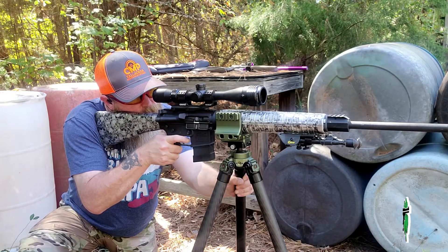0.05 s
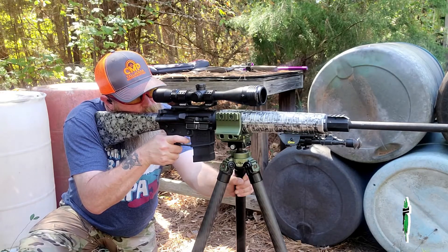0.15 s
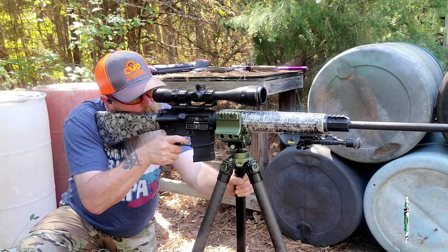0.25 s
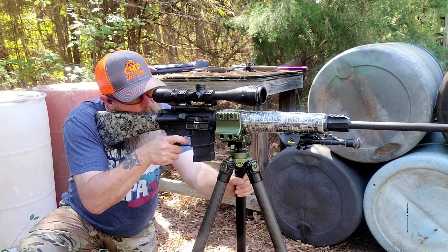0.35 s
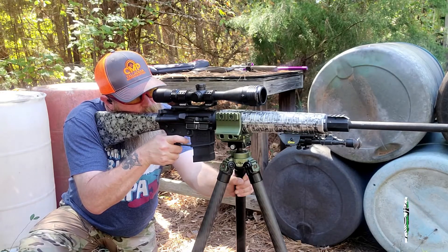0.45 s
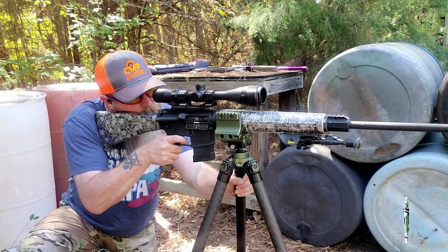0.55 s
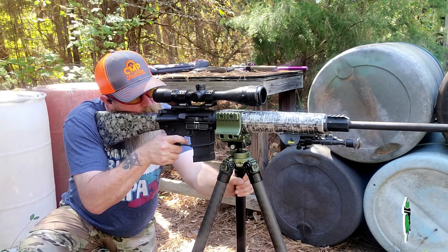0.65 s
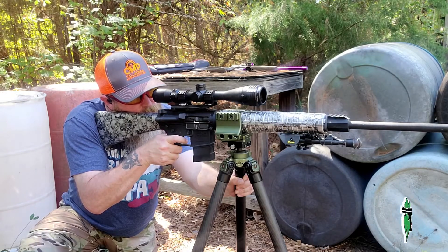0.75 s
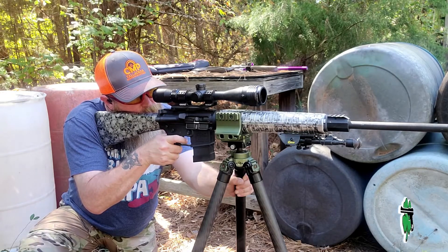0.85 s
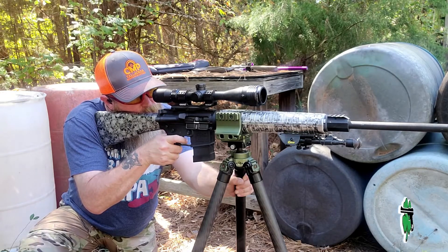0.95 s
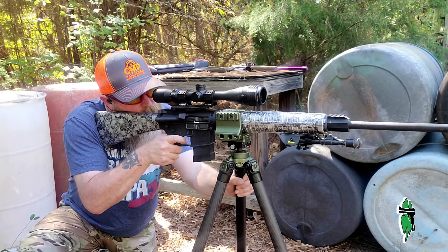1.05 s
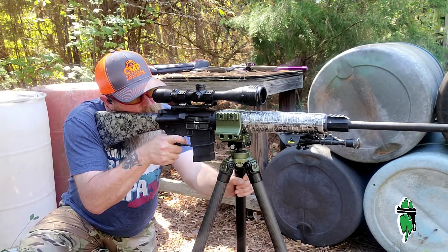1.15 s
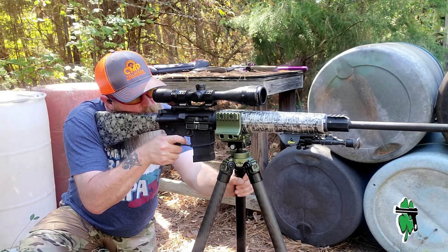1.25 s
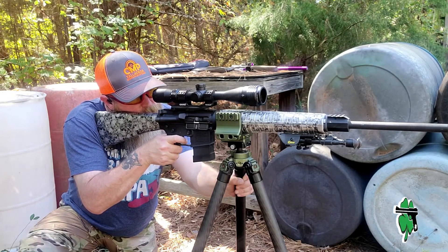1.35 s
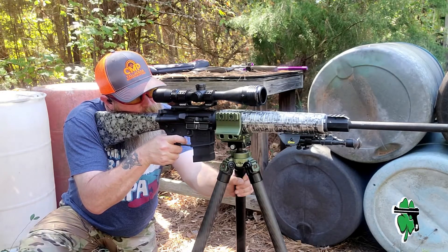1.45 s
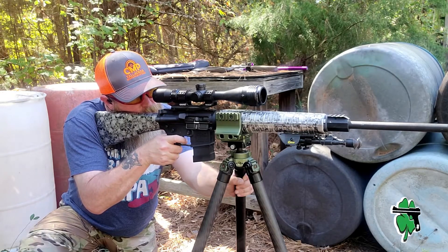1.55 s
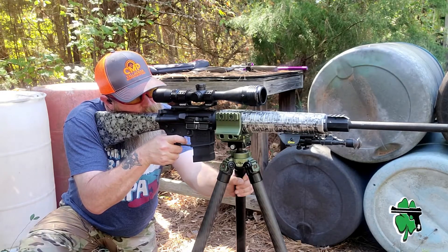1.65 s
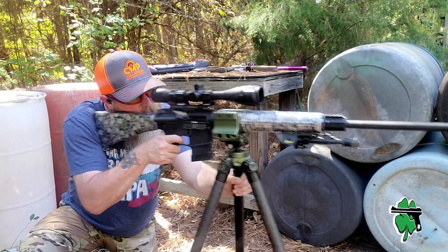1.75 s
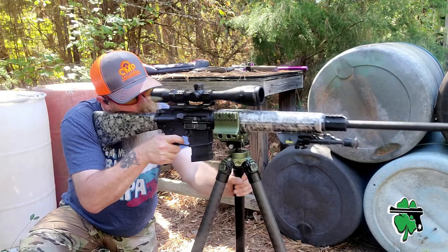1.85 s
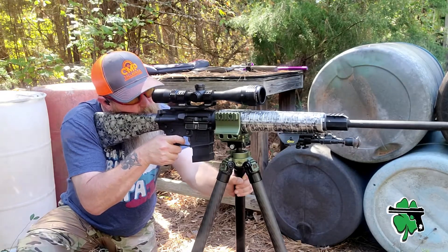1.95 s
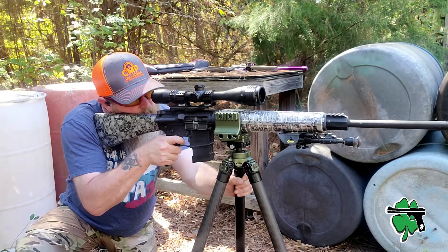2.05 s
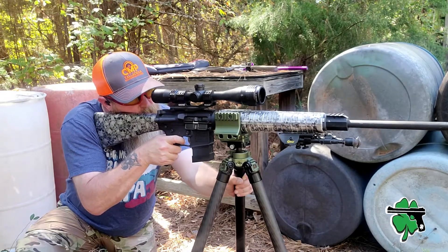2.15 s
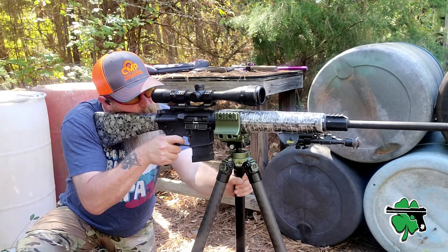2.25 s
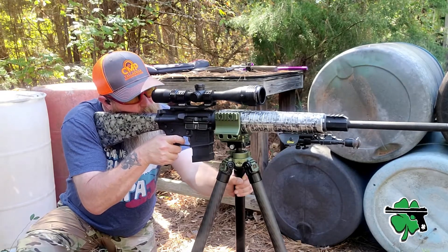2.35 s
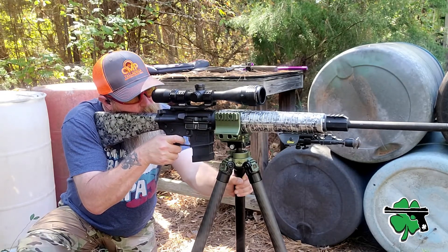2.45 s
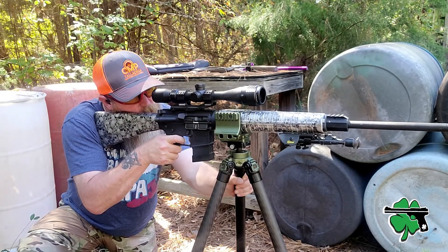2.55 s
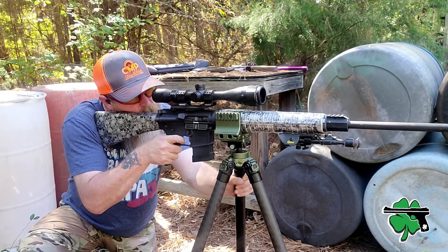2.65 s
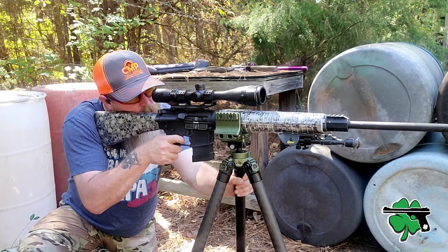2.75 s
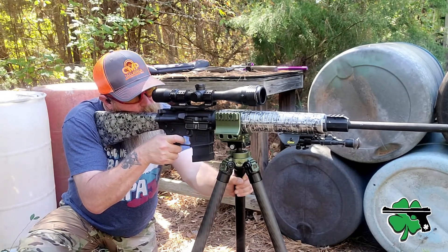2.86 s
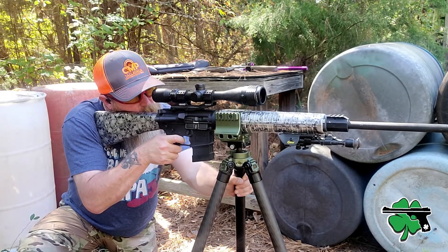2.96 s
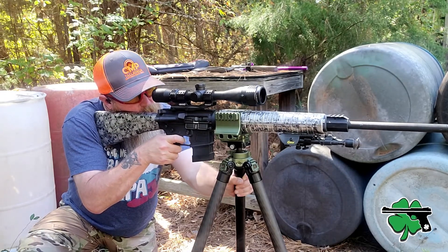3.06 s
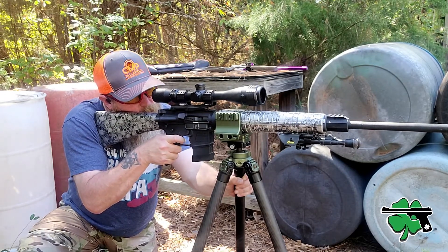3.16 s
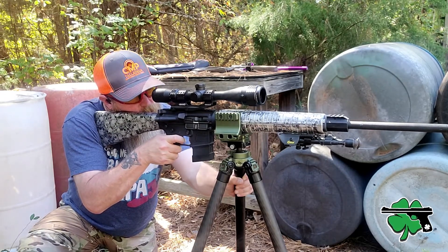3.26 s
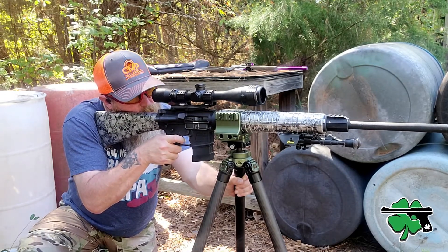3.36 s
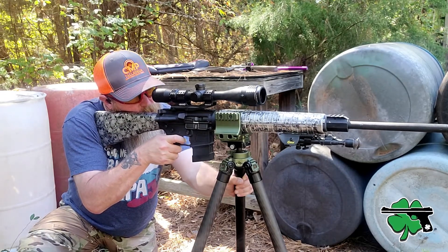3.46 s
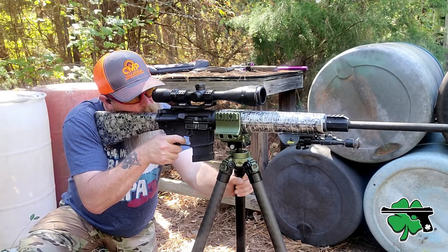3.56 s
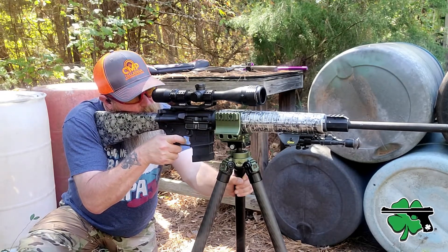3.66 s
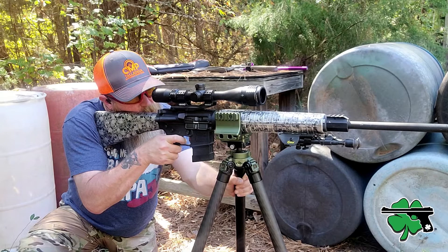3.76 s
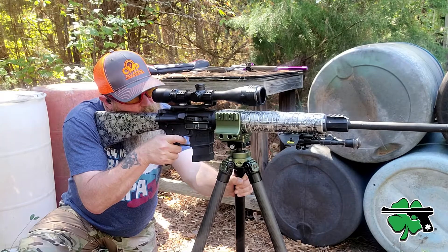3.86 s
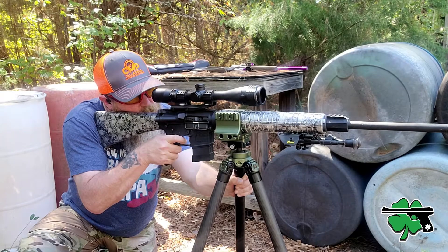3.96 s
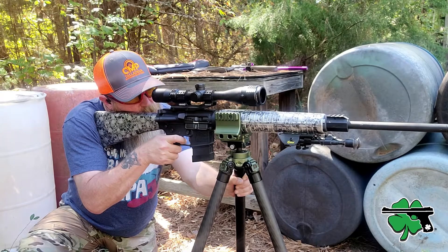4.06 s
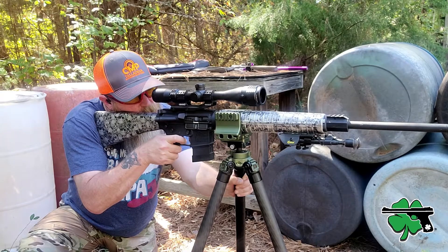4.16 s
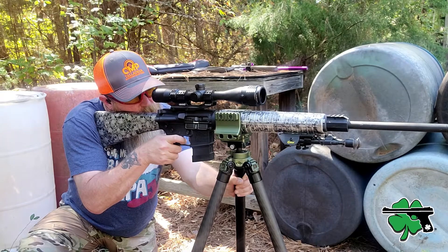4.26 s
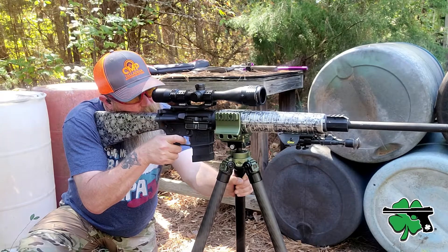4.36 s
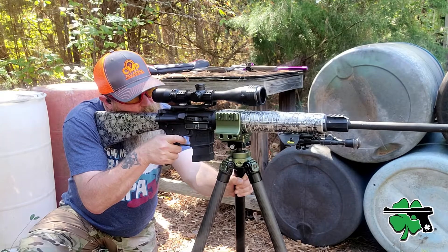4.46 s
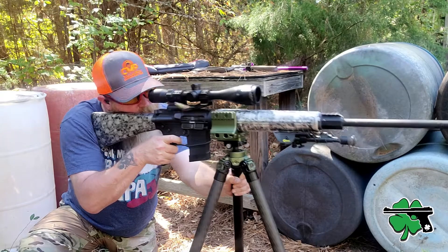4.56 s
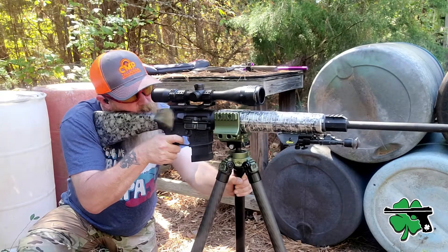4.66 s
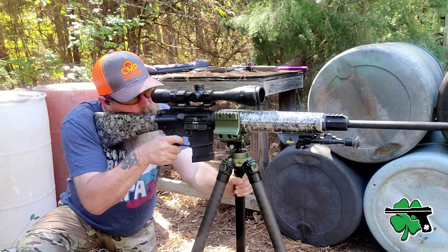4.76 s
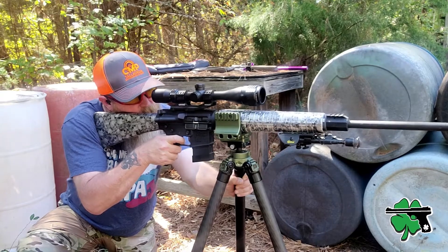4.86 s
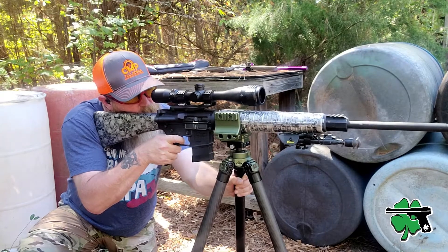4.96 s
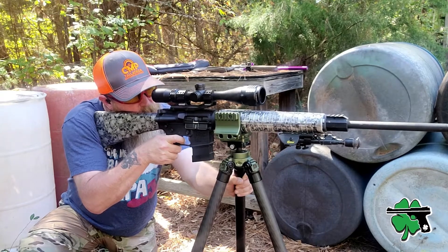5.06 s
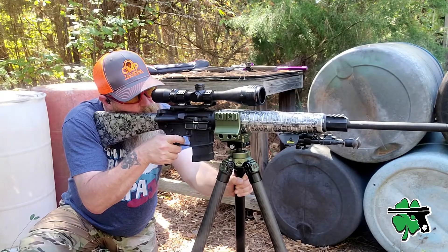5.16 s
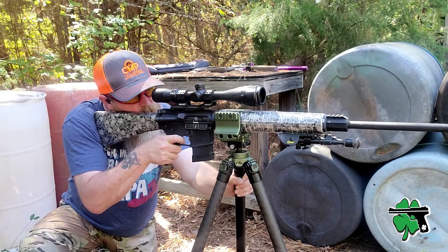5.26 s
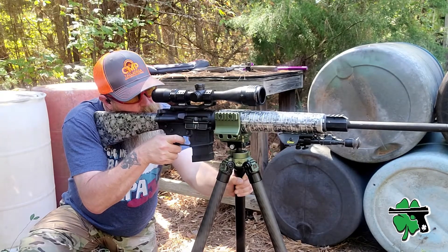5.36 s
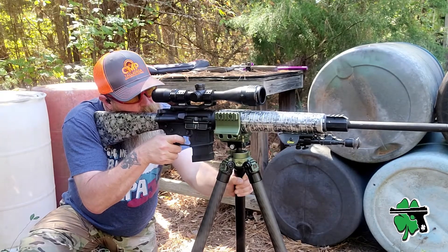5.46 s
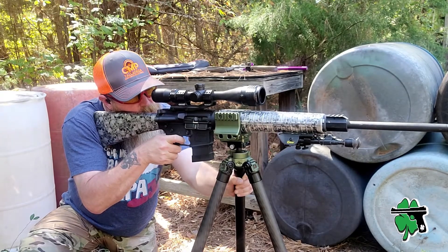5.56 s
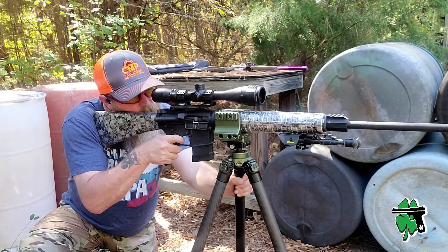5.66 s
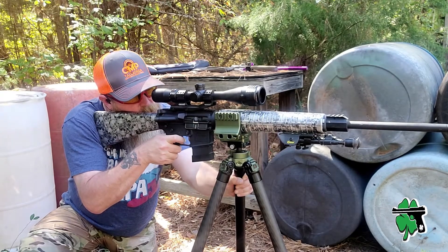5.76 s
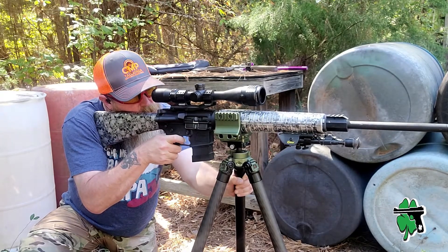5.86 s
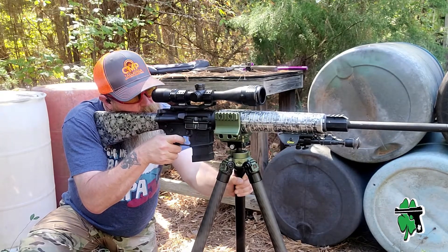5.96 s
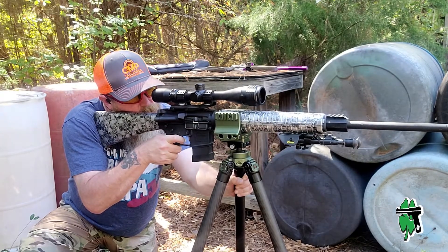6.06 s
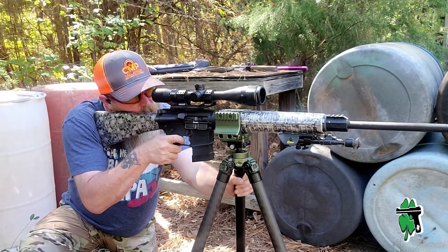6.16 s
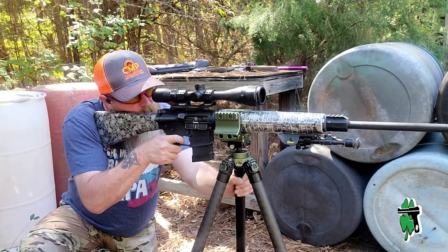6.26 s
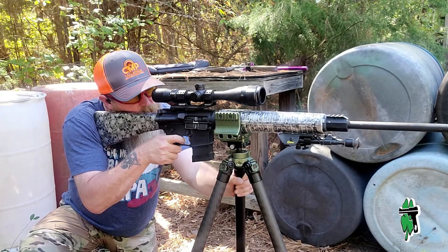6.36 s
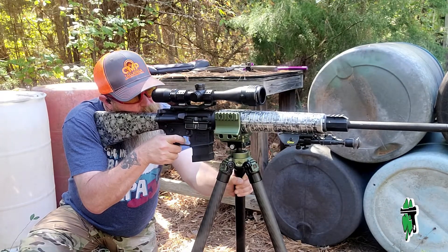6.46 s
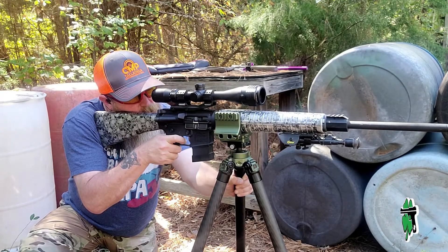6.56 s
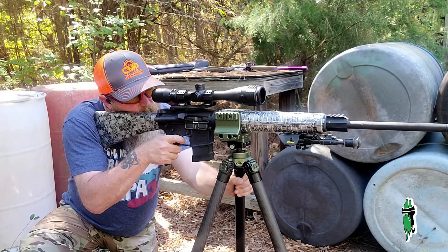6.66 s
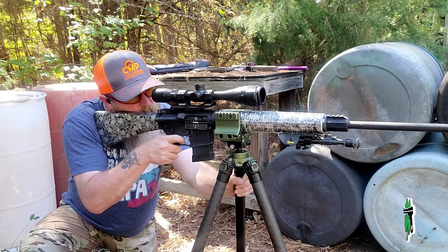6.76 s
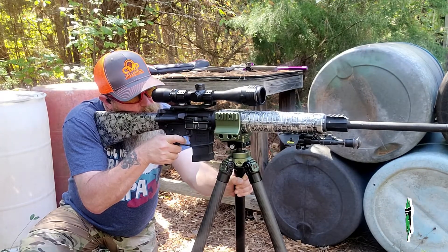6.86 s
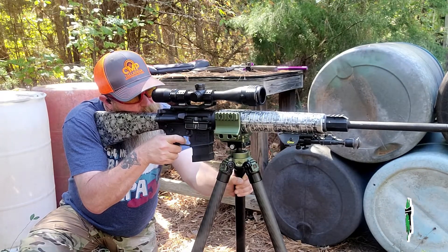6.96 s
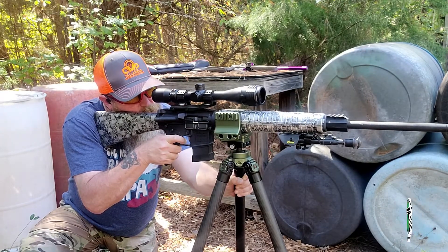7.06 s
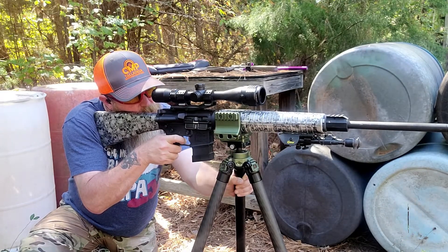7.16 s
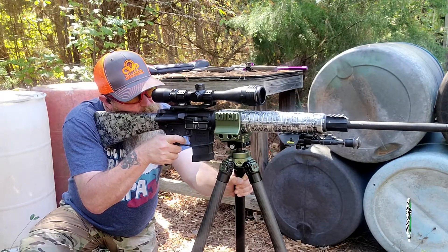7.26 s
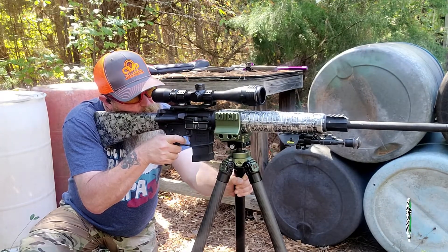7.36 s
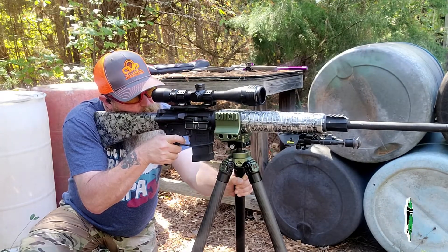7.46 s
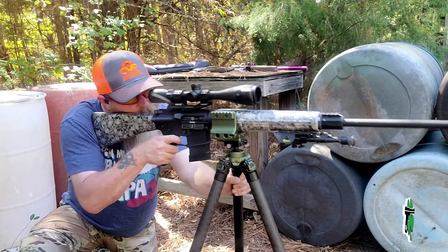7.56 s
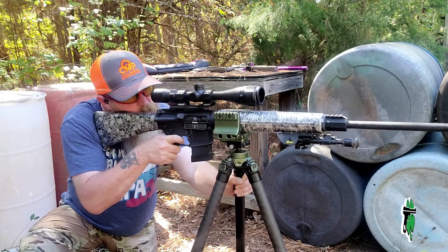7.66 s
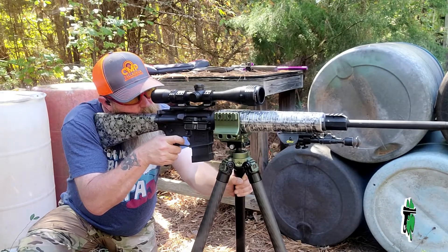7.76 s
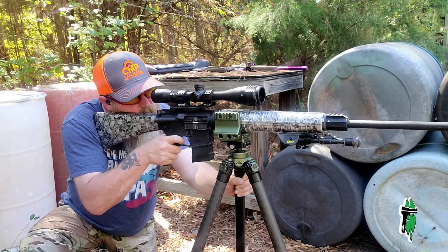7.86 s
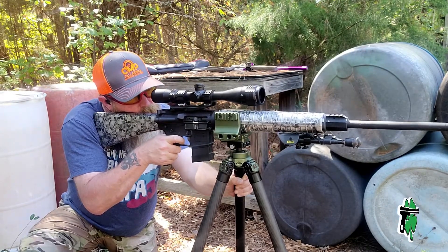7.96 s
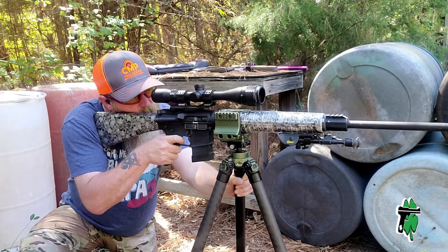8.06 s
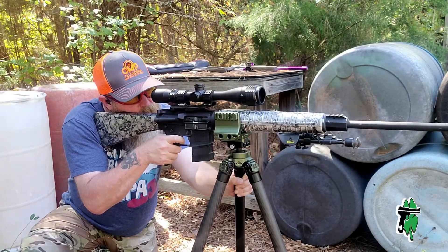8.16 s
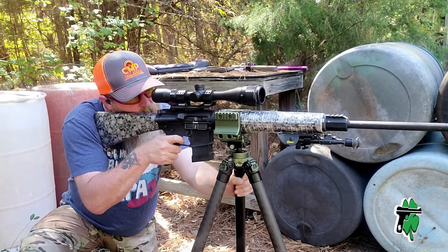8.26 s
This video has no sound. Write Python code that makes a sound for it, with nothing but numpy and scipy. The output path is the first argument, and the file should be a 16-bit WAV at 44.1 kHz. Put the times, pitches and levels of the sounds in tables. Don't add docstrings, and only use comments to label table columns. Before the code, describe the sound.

A low, faint outdoor hum of distant traffic and leaves, with muffled bumps on the recorder. At about 0.26 s a safety snaps over, small and dry. At 1.9 s a rifle fires very close: a hammer tick, then a flat, clipped blast with bolt clatter, hollow ringing from nearby drums and uneven echoes through the trees, fading over about a second. The hum drops away and slowly returns. A spent case lands faintly at 2.25 s and bounces dully at 2.5 s. A loud, crisp trigger reset clicks at 3.6 s; a light finger touch comes at 4.4 s. The second, similar shot hits at 4.64 s, its case knocking at 4.95 s and ringing brightly at 5.04 s. A stronger click with a slight tripod ring comes at 6.67 s. After a slight trigger touch, the third shot fires at 7.63 s, its tail covering faint brass landings near 8.25 s.

```python
import sys
import numpy as np
from scipy import signal
from scipy.fft import rfft, irfft, next_fast_len
from scipy.io import wavfile
from scipy.ndimage import uniform_filter1d

SR = 44100
rng = np.random.default_rng(int(sys.argv[2]) if len(sys.argv) > 2 else 0)


def dump_mix(stems):
    frames = np.atleast_2d(stems).T
    limited = np.clip(frames, -1, 1)
    pcm = np.round(limited * 32767).astype(np.int16)
    wavfile.write(sys.argv[1], SR, pcm)


def natural_amplitude(level_db):
    exponent = np.asarray(level_db, float) / 20
    return 10 ** exponent


N = 366030
TIME_S = np.arange(N) / SR
BANDS_HZ = 25 * 2 ** np.arange(0, 9.6, .5)


def read(table, hz):
    rows = np.array(table, float)
    return [np.interp(np.log(hz), np.log(rows[:, 0]), column) for column in rows[:, 1:].T]


def bands(size, colour):
    fast = next_fast_len(size)
    freq = np.fft.rfftfreq(fast, 1 / SR) + 1
    spectrum = rfft(rng.standard_normal(fast)) * colour(freq)
    for hz in BANDS_HZ:
        window = np.cos(np.pi / 2 * np.clip(2 * np.log2(freq / hz), -1, 1))
        yield irfft(spectrum * window, fast)[:size] / np.sqrt(np.mean(window ** 2))


def hiss(size, low_hz, high_hz):
    return signal.lfilter(*signal.butter(3, [low_hz, high_hz], "band", fs=SR), rng.standard_normal(size))


def fade(t, t60_s):
    return (t >= 0) * np.exp(-np.log(1000) * np.maximum(t, 0) / max(t60_s, 1e-3))


def walk(rate_hz):
    hold = int(SR / rate_hz)
    return uniform_filter1d(np.repeat(rng.standard_normal(N // hold + 1), hold), hold)[:N]


def add(out, wave, s):
    i = int(s * SR)
    out[i:i + len(wave)] += wave[:len(out) - i]


def ports(left_minus_right_db):
    return natural_amplitude(np.array([[left_minus_right_db], [-left_minus_right_db]]) / 2)


def strike(modes, crack_db, crack_t60_s, push_s, bright_db_oct=0, top_hz=9700):
    t = np.arange(int(SR * max(max(m[2] for m in modes), crack_t60_s))) / SR
    ring = np.zeros(len(t))
    for k, (hz, db, t60_s) in enumerate(modes):
        gain = (-1) ** k * natural_amplitude(db + bright_db_oct * np.log2(hz / 1000))
        ring += gain * fade(t, t60_s) * np.sin(2 * np.pi * hz * t)
    crack = natural_amplitude(crack_db) * fade(t, crack_t60_s) * hiss(len(t), 850, top_hz)
    wave = (ring / np.abs(ring).max() + crack) * (1 - np.exp(-t / push_s)) ** 2
    return wave / np.abs(wave).max()


# (frequency [Hz], density [dB per Hz])
HUM = [(22, -26.5), (45, -2.5), (91, -2.5), (230, -14.5), (520, -5.5), (980, -9.5), (1230, -21.5),
       (8000, -33)]
# (frequency [Hz], left minus right [dB])
TILT = [(80, -4.5), (200, -0.5), (380, -4), (700, -12), (1290, 1), (2380, 4), (4400, -3.5), (9000, 0.5)]
# (frequency [Hz], likeness [0-1])
LIKE = [(60, 0.86), (130, 0.99), (290, 0.93), (640, 1), (1410, 1), (3100, 0.2), (6820, 0.5), (15000, 0)]
HUM_DB = -67


def hum():
    out, swell = 0, walk(0.23)
    colour = lambda freq: natural_amplitude(read(HUM, freq)[0])
    for hz, mid, side in zip(BANDS_HZ, bands(N, colour), bands(N, colour)):
        gust_db = 1.0 + 1.8 / (1 + (hz / 90) ** 2)
        db = 10 * np.log10(hz / 600) + .4 * swell + gust_db * walk(12)
        like, tilt_db = np.clip(read(LIKE, hz)[0], 0, 1), read(TILT, hz)[0]
        pair = np.array([np.sqrt(like) * mid + np.sqrt(1 - like) * side, mid])
        out = out + natural_amplitude(db) * pair * ports(tilt_db)
    return natural_amplitude(HUM_DB - 3) * out


# (frequency [Hz], level [dB], t60 [s])
GRIP = [(673, -1.5, 0.017), (803, 0, 0.013), (931, 0.5, 0.026), (1430, -8.5, 0.01), (2140, -17.5, 0.017),
        (3050, -20, 0.017)]
# (time [s], level [dB], brightness [dB per octave], crack [dB], rustle [dB])
TOUCHES = [
    (.050, -53.5, 7, 6, -0.5),
    (.2485, -46, -3, -20, -30),
    (.2575, -40, 3, -8, -32),
    (0.2615, -18, -6, -9, -35),
    (0.346, -53, -10, -15, -20),
    (4.407, -40, 7, -9, -20),
    (7.606, -38, 6, -24, -11.5),
]


def touches():
    out, t = np.zeros((2, N)), np.arange(SR // 2) / SR
    for s, db, bright_db_oct, crack_db, rustle_db in TOUCHES:
        push_s = .0009 * natural_amplitude(-.2 * (db + 19.5))
        rustle = hiss(len(t), 600, 1300) + 0.24 * hiss(len(t), 1500, 6000)
        one = np.zeros(N)
        add(one, natural_amplitude(db) * strike(GRIP, crack_db, 0.01, push_s, bright_db_oct, 6200), s)
        add(one, natural_amplitude(db + rustle_db) * rustle * fade(t, 0.48), s)
        out += one * ports(-2.4)
    return out


# (time [s], level [dB], frequency [Hz])
THUMPS = [(.10, -50, 50), (.32, -54, 52), (.47, -65, 45), (.72, -74, 60), (1.08, -67, 42), (1.31, -60, 55),
          (1.70, -65.5, 45), (3.65, -58, 70), (3.84, -64, 50), (4.22, -62, 40), (4.48, -65, 50),
          (6.685, -48.5, 80), (7.30, -67, 44.8)]


def body_knocks():
    out, u = np.zeros(N), np.arange(-SR // 10, SR // 10) / SR
    for s, db, hz in THUMPS:
        add(out, natural_amplitude(db) * np.exp(-(u / 0.019) ** 2) * np.sin(2 * np.pi * hz * u), s - 1 / 10)
    return out * ports(-6.0)


# (frequency [Hz], width [Hz], gain [dB])
DRUMS = [(70, 8.9, 6), (377, 34, 2.5), (552.3, 32, 7), (725, 66, 5.5), (846, 78, 5), (980, 120, 3),
         (2900, 300, 1.5), (4950, 600, 3)]


def drums(freq):
    return natural_amplitude(sum(db / (1 + (2 * (freq - hz) / width_hz) ** 2) for hz, width_hz, db in DRUMS))


# (delay [s], depth [s], level [dB])
STANDS = [
    (.088, .015, 4.5),
    (.15, .018, 6.5),
    (.26, .03, 3),
    (.31, .015, -4.5),
    (.345, .012, 4),
    (.41, .03, -3),
    (.505, .055, 6),
]
OPEN_DB, OPEN_UNTIL_S = -3.5, 0.68
THICKET_S, THICKET_DEPTH_S, THICKET_DB = .27, .07, 3.5
BEHIND_S, BEYOND_DB = .355, -4.5


def wash(t):
    bump = lambda s, depth_s: np.exp(-((t - s) / depth_s) ** 2)
    low_db = OPEN_DB * bump(0, OPEN_UNTIL_S) + sum(db * bump(s, depth_s) for s, depth_s, db in STANDS)
    behind = (1 + np.tanh((t - BEHIND_S) / .025)) / 2
    return low_db, THICKET_DB * bump(THICKET_S, THICKET_DEPTH_S) + BEYOND_DB * behind


# (frequency [Hz], near [dB], near t60 [s], wood [dB], far [dB])
PLACE = [(30.4, -15, .2, -38, -77), (65, -6, 0.31, -24.5, -67.5), (213, -8, .3, -17.5, -68.5),
         (594, 14, .125, -10.5, -42), (980, 6, 0.1, -9.5, -43), (2200, 12, 0.07, -12, -53),
         (5400, 6, 0.044, -13, -63), (15000, 6, 0.061, -13, -93)]
# (favoured frequency [Hz], length [ms], [(delay [s], level [dB])])
ECHOES = [
    (68, 14, [(.033, -8)]),
    (161, 7, [(.028, -9), (.085, -13), (.155, -11.5), (.255, -13.5), (.330, -19)]),
    (560, 3.7, [(.034, 5), (.080, -4.5), (.092, -3), (.136, -2), (.152, -1.5), (.169, 0), (.346, -15)]),
    (830, 1.7, [(.230, -12), (.277, -8), (.344, -10), (.4595, -14), (.473, -17), (.533, -23), (.565, -23)]),
    (2500, 0.91, [(.089, -4.5), (.175, -10.5)]),
    (5500, .5, [(.059, -4.5)]),
]
# (start [s], end [s], level [dB], edge [s], t60 after [s])
BOLT = (0.056, 0.095, -14, .006, 0.12)
RISE_S, RISE_HZ = 0.017, 1100
WOOD_T60_S, WOOD_AIR_HZ, FAR_T60_S, FAR_AIR_HZ = 1.328, 10200, 5.0, 4000


def blast(size=90000):
    t, out = np.arange(size) / SR, np.zeros((len(SHOTS), size))
    start_s, end_s, bolt_db, edge_s, bolt_t60_s = BOLT
    rattle = (1 + np.tanh((t - start_s) / edge_s)) / 2 * fade(np.maximum(t - end_s, 0), bolt_t60_s)
    low_db, high_db = wash(t)
    noises = [bands(size, drums) for _ in range(len(SHOTS) + 1)]
    for hz, same, *own in zip(BANDS_HZ, *noises):
        near_db, near_t60_s, wood_db, far_db = read(PLACE, hz)
        rise_s = RISE_S / (1 + (hz / RISE_HZ) ** 2)
        wood_t60_s, far_t60_s = WOOD_T60_S / (1 + hz / WOOD_AIR_HZ), FAR_T60_S / (1 + hz / FAR_AIR_HZ)
        wash_db = low_db / (1 + (hz / 1800) ** 2) + high_db * np.clip(np.log2(hz / 2000) / 2.7, 0, 2)
        near = natural_amplitude(near_db) * fade(t, near_t60_s)
        wood = natural_amplitude(wood_db + wash_db) * fade(t, wood_t60_s)
        far = natural_amplitude(far_db) * fade(t, far_t60_s)
        envelope = np.sqrt(near ** 2 + wood ** 2 + far ** 2) * (1 - np.exp(-t / rise_s)) ** 2
        envelope += natural_amplitude(bolt_db - 11.0 * abs(np.log2(hz / 5000))) * rattle
        share = np.clip(1 - hz / 6000, .2, .97)
        out += natural_amplitude(-5.5) * envelope * (np.sqrt(share) * same + np.sqrt(1 - share) * np.array(own))
    faces = [(delay_s, db, hz, ms) for hz, ms, rows in ECHOES for delay_s, db in rows]
    draws = rng.uniform(-1.2, 1, (len(faces), 1 + len(SHOTS)))
    u = np.arange(-SR // 50, SR // 30) / SR
    for (delay_s, db, hz, ms), (phase, *sizes) in zip(faces, draws):
        envelope = np.exp(-np.abs(u) * 1000 / ms * np.where(u < 0, 3.0, 1.2))
        wavelet = envelope * np.cos(2 * np.pi * hz * u + np.pi * phase)
        for report, v in zip(out, sizes):
            add(report, natural_amplitude(db + 1.3 * v) * wavelet, delay_s - 1 / 50)
    return out


# (hammer [s], blast [s], level [dB], bolt slams home [s])
SHOTS = [
    (1.8868, 1.8961, -4.25, 1.9685),
    (4.6313, 4.6410, -3.96, 4.708),
    (7.6221, 7.6316, -4.2, 7.7010),
]
# (frequency [Hz], level [dB], t60 [s])
HAMMER = [(980, -29, .025), (1700, -29, 0.035), (2260, -26.5, 0.032), (3020, -8.5, 0.0077),
          (4370, 0.5, .006), (6430, -9.5, .0055), (11000, -10, 0.0037)]


def rifle():
    ticks, reports = np.zeros(N), np.zeros(N)
    for (hammer_s, fire_s, db, slam_s), report in zip(SHOTS, blast()):
        add(ticks, natural_amplitude(3.5) * strike(HAMMER, 0.1, 0.0046, 0.00062), hammer_s - .0003)
        add(reports, natural_amplitude(db) * report, fire_s)
        add(reports, natural_amplitude(-22.5) * strike(CASE, -9, .01, .002), fire_s + 0.05)
        add(reports, natural_amplitude(-1.5) * strike(HAMMER, 10, .022, 0.0016), slam_s - .001)
    return reports + ticks * ports(-1.4)


DUCK_DB, RECOVER_S = -23, 0.96


def recovering_gain():
    duck_db = np.zeros(N)
    for _, fire_s, *_ in SHOTS:
        since_s = np.maximum(TIME_S - fire_s, 0)
        duck_db += DUCK_DB * (TIME_S > fire_s) * np.exp(-(since_s / RECOVER_S) ** 2)
    return natural_amplitude(duck_db)


# (frequency [Hz], level [dB], t60 [s])
CASE = [(6602, -1.5, 0.17), (7900, -17, .03), (9500, -9, .03), (12380, -0.2, .06), (14300, -1.5, .18),
        (14450, -6, .12), (15460, -5.5, .11)]
# (time [s], level [dB], share of ring time left by the ground [0-1], crack [dB])
LANDINGS = [
    (2.246, -51.5, 0.35, -4.5),
    (2.533, -58, 0.13, 10),
    (4.954, -49, 0.13, -6),
    (5.036, -30, 0.92, -4),
    (5.196, -50.5, .15, -2),
    (8.242, -56, 0.24, 2),
    (8.297, -50.5, 0.2, 2),
]
# (time [s], level [dB], frequency [Hz])
KNOCKS = [
    (4.954, -31.5, 4450),
    (5.036, -32.5, 2340),
    (5.196, -64, 7900),
]


def cases():
    out = np.zeros(N)
    for s, db, free, crack_db in LANDINGS:
        modes = [(hz, mode_db, free * t60_s) for hz, mode_db, t60_s in CASE]
        add(out, natural_amplitude(db + 3) * strike(modes, crack_db, .035, 0.00044), s - .001)
    for s, db, hz in KNOCKS:
        add(out, natural_amplitude(db + 7.0) * strike([(hz, 0, .045)], -41.5, 0.011, 0.0011), s - .001)
    return out


# (frequency [Hz], level [dB], t60 [s])
ACTION = [(146, -29.5, 0.11), (291.1, -25.5, 0.029), (522, -16, 0.043), (690, -6.5, 0.029),
          (830, -11.5, 0.032), (1050, -3.5, 0.047), (1270, -12, 0.032), (1530, -12, 0.024),
          (2144, -8.5, 0.026), (3060, -4.5, 0.015), (4130, -9.5, 0.012), (5180, -11, .014),
          (5830, -8.5, .013), (7380, -8, 0.0084)]
# (frequency [Hz], level [dB], t60 [s])
TRIPOD = [(523, -6, 0.63), (531, 2, 0.3), (1040, -7, 0.63), (1000, -6, 0.43)]
# (time [s], peak [dB], brightness [dB per octave], crack [dB], tripod ring [dB])
CLICKS = [
    (3.614, -5.5, 2.3, 0.5, -47),
    (6.672, -2.5, 3.5, -3, -40.5),
]
CLICK_PAN_DB = -1.82


def trigger():
    out, t = np.zeros((2, N)), np.arange(SR // 2) / SR
    for s, db, bright, crack_db, tripod_db in CLICKS:
        one = np.zeros(N)
        slip = strike(GRIP, -19, 0.015, .0012)
        crack = strike(ACTION, crack_db + 5.5, 0.0065, 0.0013, bright, 13500)
        bounce = strike(ACTION, crack_db - 5, 0.0146, 0.00037, bright - 1.5)
        add(one, natural_amplitude(db - 26.5) * slip, s - .004)
        add(one, natural_amplitude(db + 2.5) * crack, s - .0002)
        add(one, natural_amplitude(tripod_db) * strike(TRIPOD, -40, .01, 0.0014), s)
        add(one, natural_amplitude(db - 5.5) * bounce, s + 0.0042)
        scatter = natural_amplitude(3.6 * walk(150)[:len(t)]) * hiss(len(t), 900, 7500)
        scatter *= fade(t, .07) + natural_amplitude(-15.0) * fade(t, .35)
        add(one, natural_amplitude(db - 29) * scatter, s)
        add(one, natural_amplitude(db - 30.5) * hiss(len(t), 450, 1020) * fade(t, 1.0), s)
        one = signal.lfilter(*signal.butter(1, 200, "high", fs=SR), one)
        out += one * ports(CLICK_PAN_DB)
    return out


def scene():
    background = (hum() + body_knocks()) * recovering_gain()
    return background + touches() + rifle() + cases() + trigger()


def roll_off(x):
    return signal.sosfilt(signal.butter(12, 15610, fs=SR, output="sos"), x)


def record(dry):
    flat = np.clip(dry, -.97, .97)
    cut = signal.sosfilt(signal.butter(2, 14500, fs=SR, output="sos"), flat)
    mix = np.clip(1.225 * cut, -1, 1)
    return roll_off(mix)


dry = scene()
out = record(dry)
dump_mix(out)
```